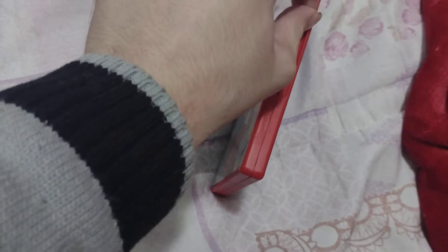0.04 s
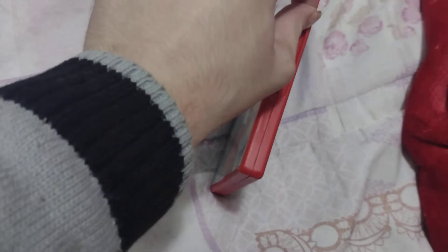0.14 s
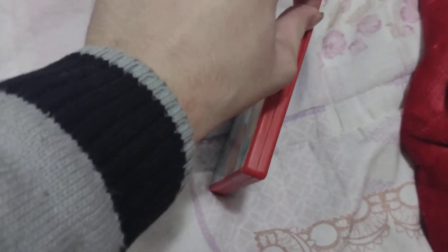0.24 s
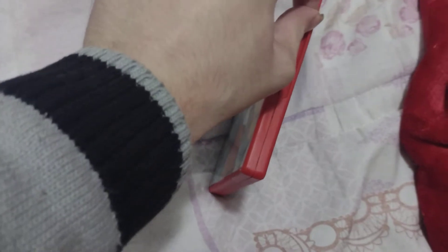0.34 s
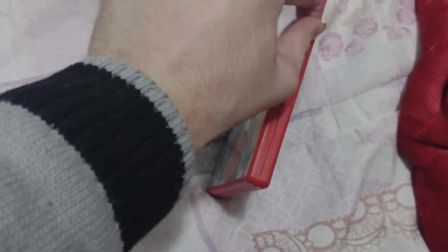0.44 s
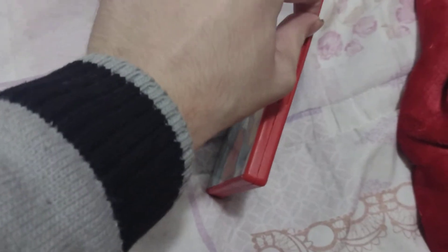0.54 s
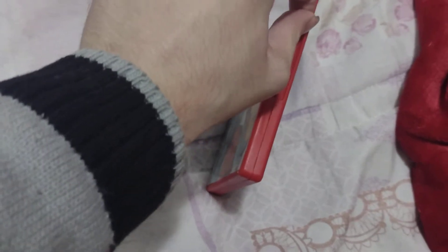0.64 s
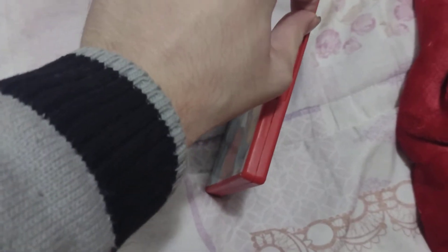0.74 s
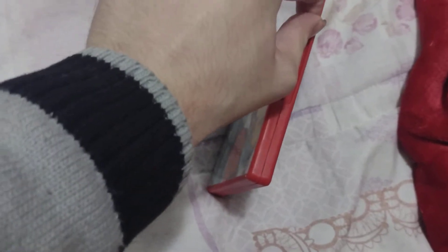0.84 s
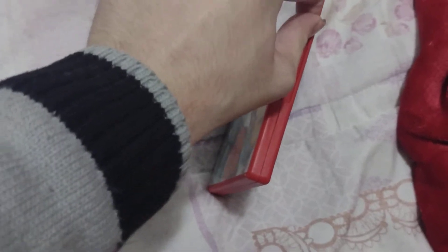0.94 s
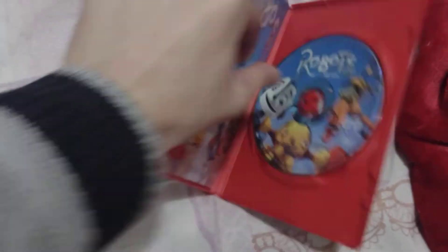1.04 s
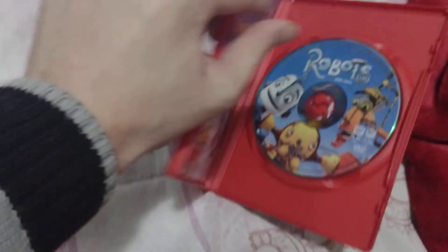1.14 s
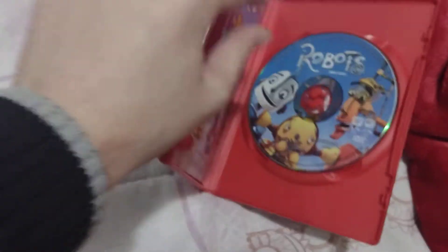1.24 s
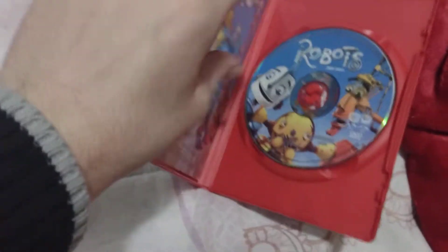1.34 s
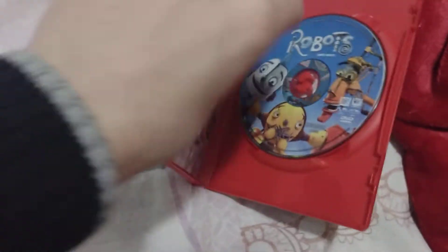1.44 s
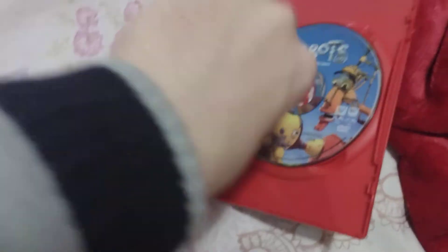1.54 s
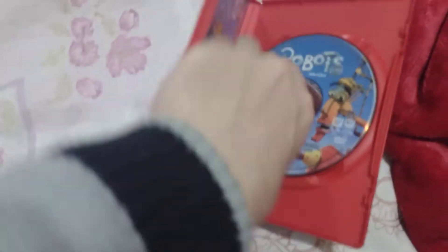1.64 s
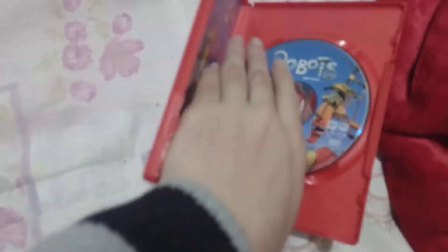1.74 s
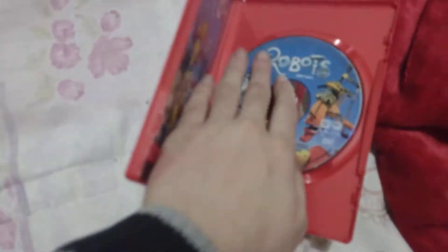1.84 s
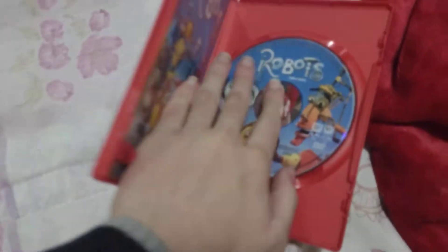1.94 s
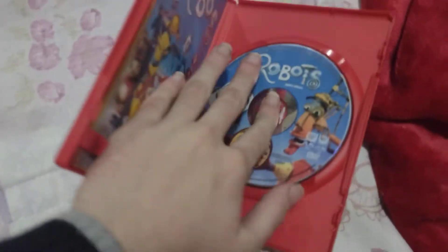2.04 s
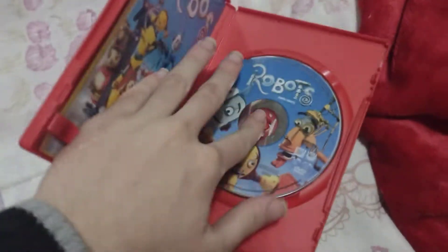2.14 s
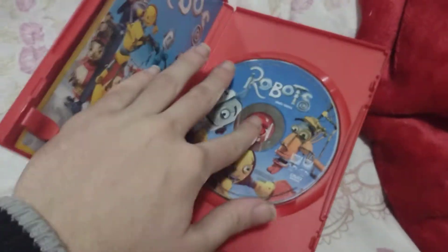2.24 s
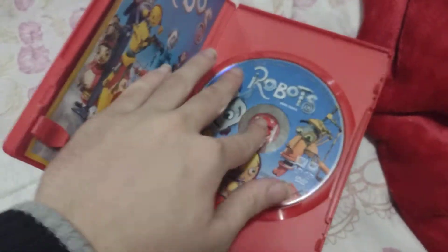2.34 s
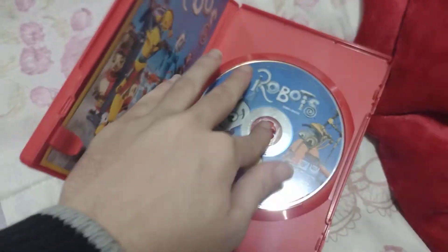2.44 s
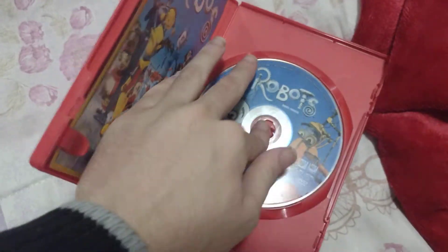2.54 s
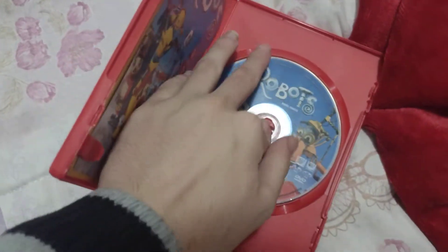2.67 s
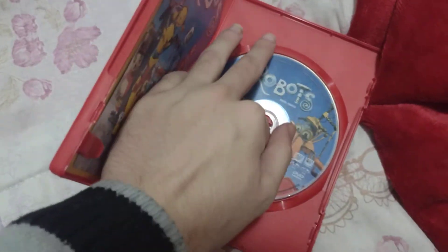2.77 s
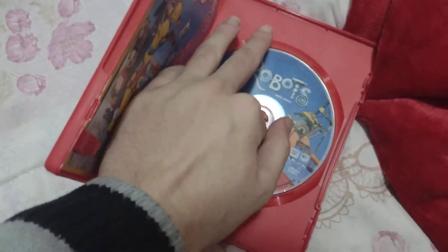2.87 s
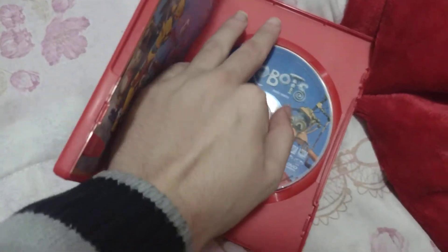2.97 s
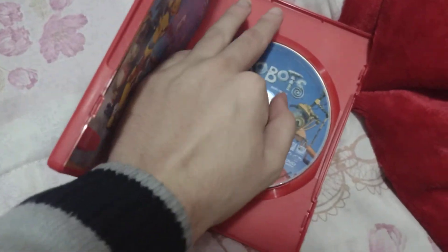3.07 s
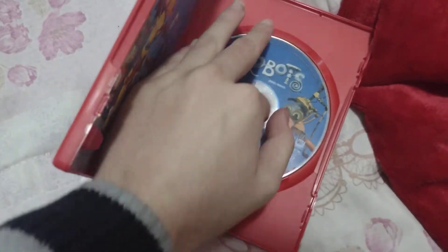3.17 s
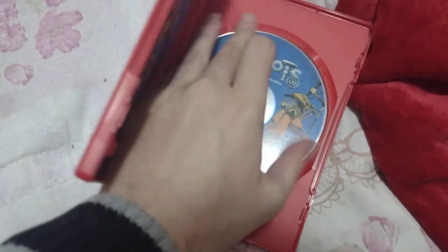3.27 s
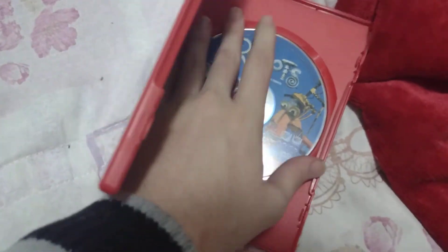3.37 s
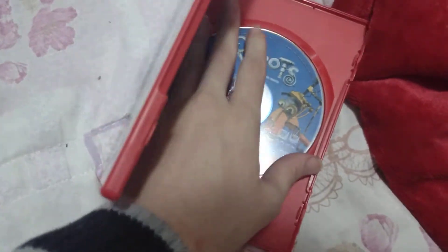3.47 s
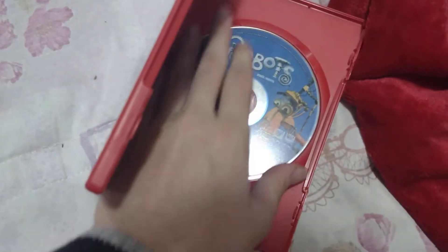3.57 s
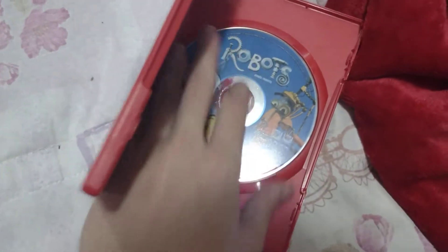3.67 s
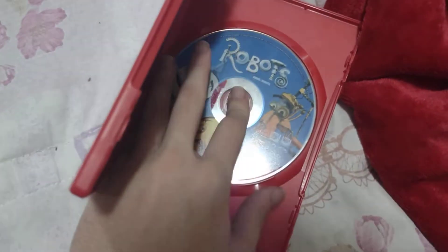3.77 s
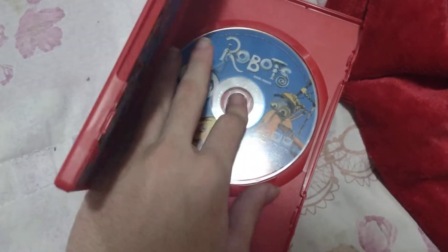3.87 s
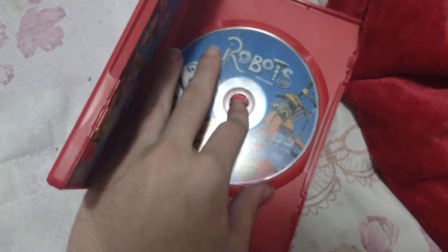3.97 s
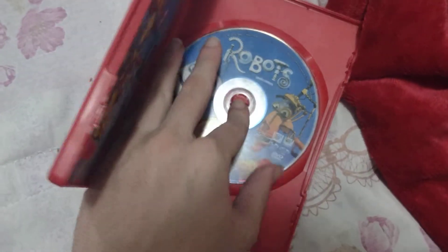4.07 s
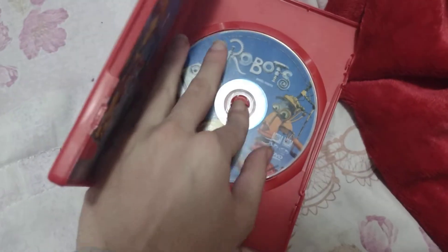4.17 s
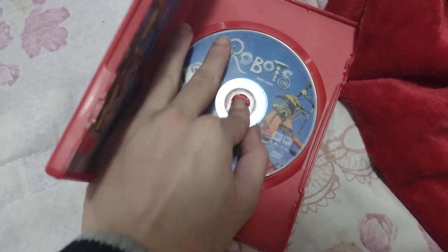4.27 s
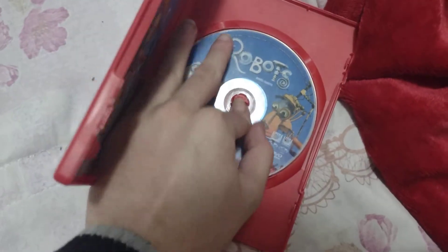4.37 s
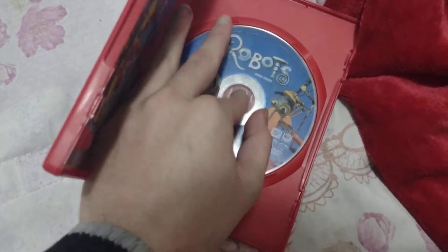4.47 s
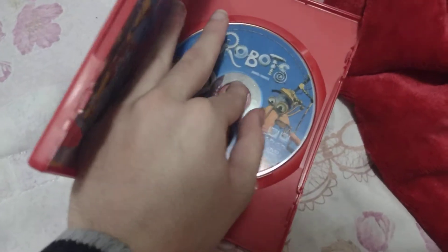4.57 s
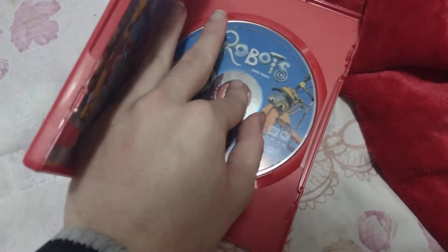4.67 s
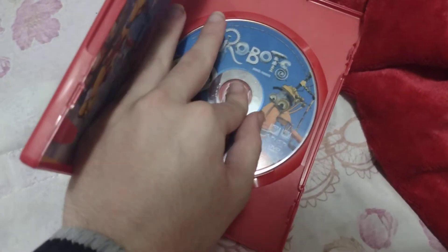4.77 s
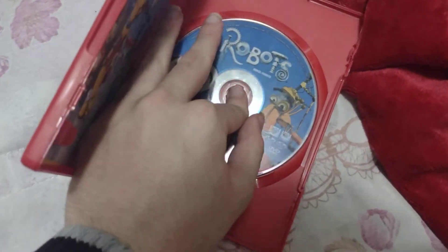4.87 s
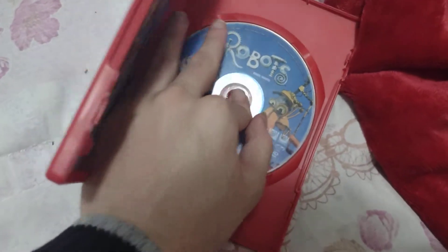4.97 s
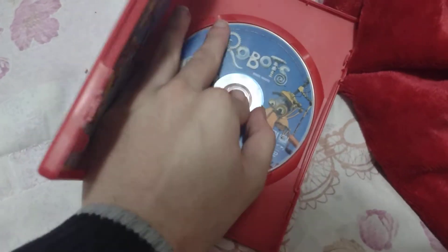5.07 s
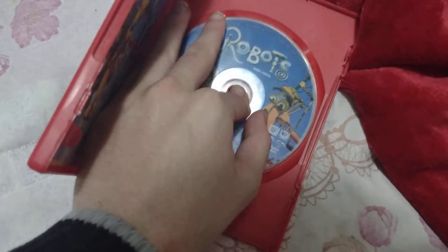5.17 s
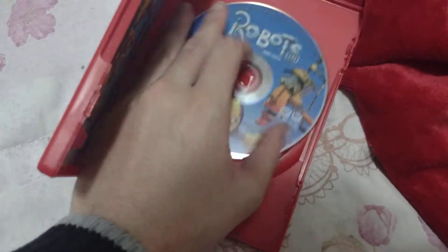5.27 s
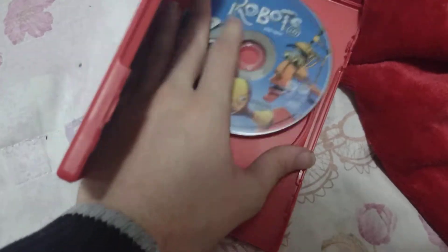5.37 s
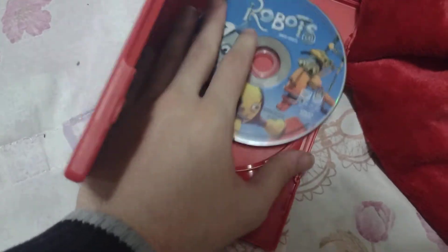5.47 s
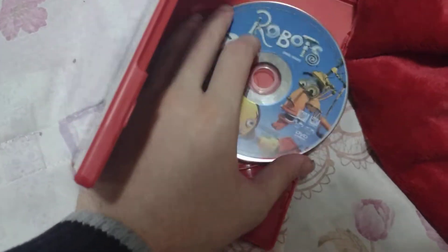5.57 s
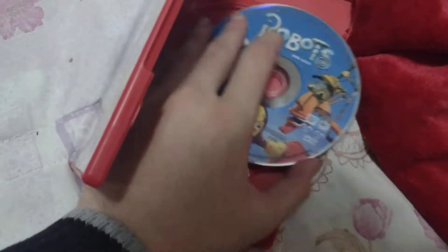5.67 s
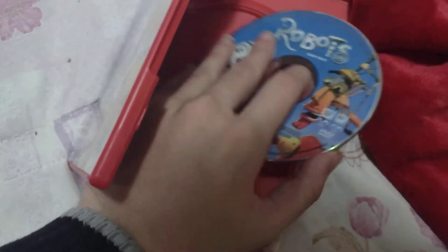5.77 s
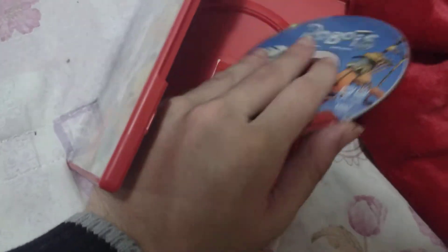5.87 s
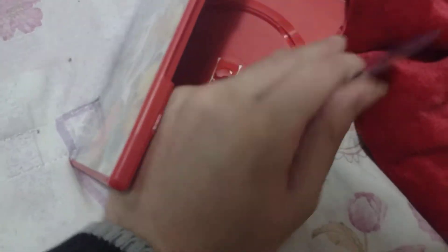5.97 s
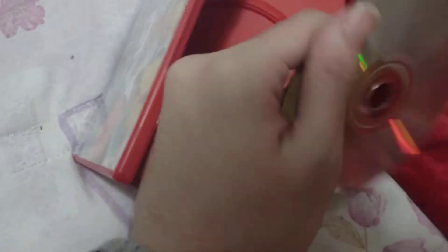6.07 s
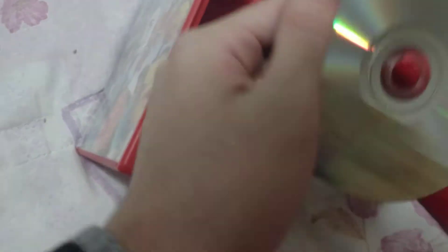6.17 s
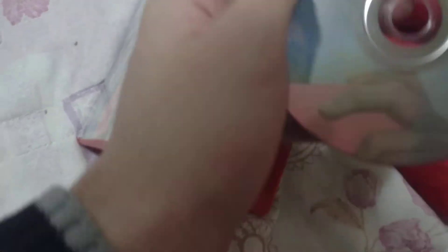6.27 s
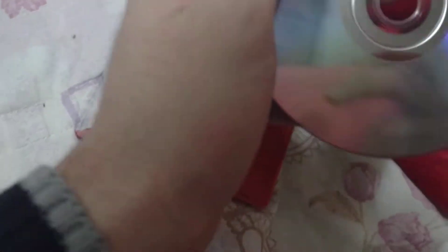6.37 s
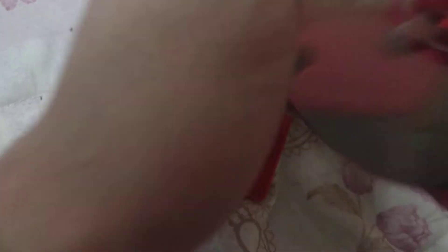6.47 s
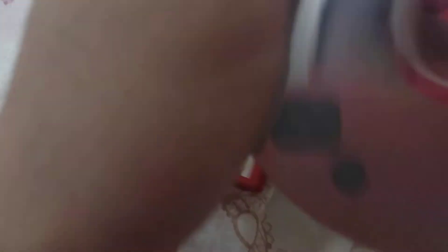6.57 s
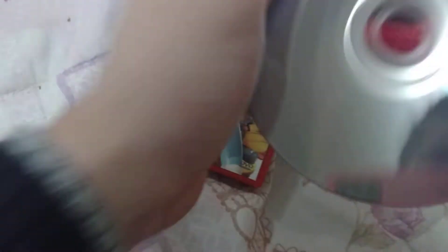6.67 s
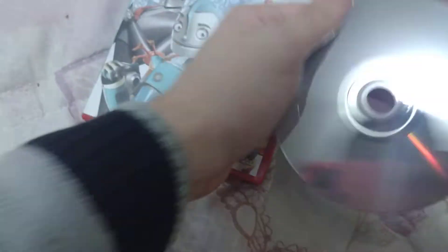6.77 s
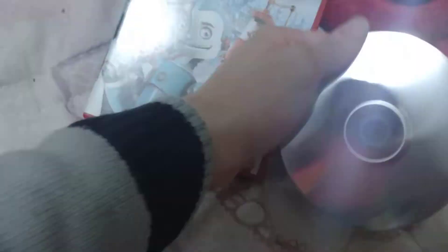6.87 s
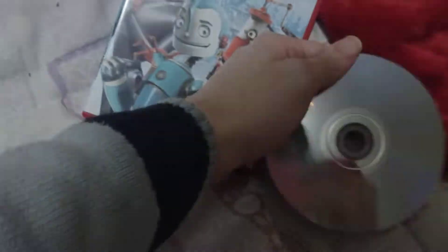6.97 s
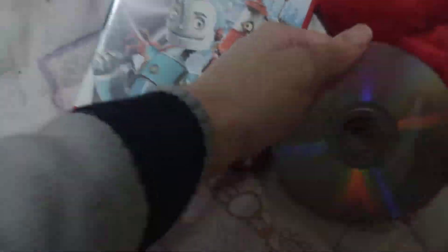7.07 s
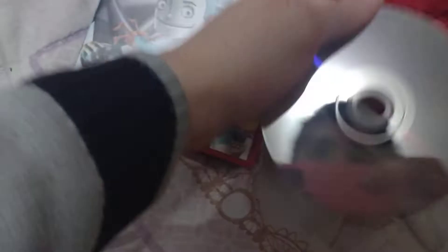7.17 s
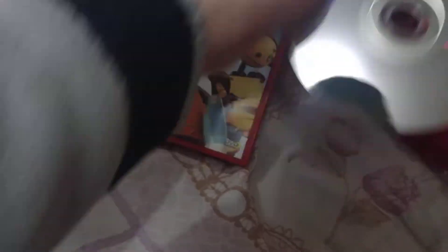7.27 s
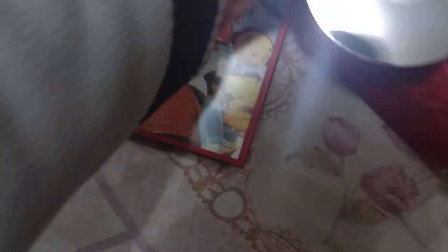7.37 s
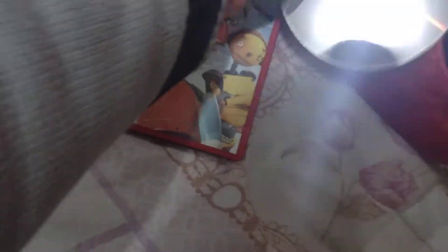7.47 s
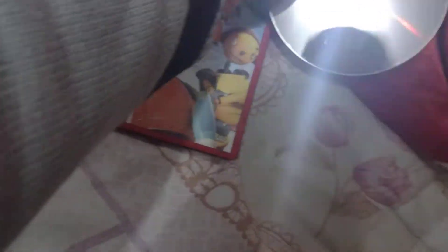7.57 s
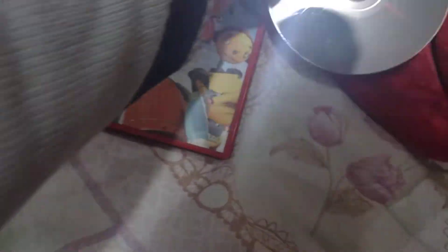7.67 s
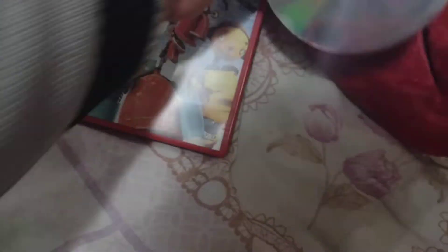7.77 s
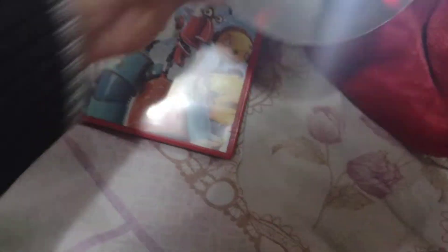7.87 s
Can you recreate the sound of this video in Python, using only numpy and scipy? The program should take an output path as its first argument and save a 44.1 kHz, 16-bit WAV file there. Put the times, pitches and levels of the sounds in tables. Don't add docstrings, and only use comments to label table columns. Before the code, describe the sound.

After a second of near silence, a plastic disc case bursts open with a tight cluster of bright snaps and crackles. Faint hand rubbing and small ticks follow, then scattered sharp clicks as fingers prise the disc from its hub. It pops loose, drags faintly with a hollow hum, and a few duller knocks end it. Close small stereo microphone, furnished room, soft bedding, fluttering gated noise.

```python
import sys
import numpy as np
from scipy import signal
from scipy.fft import rfft, irfft
from scipy.io import wavfile
from scipy.ndimage import uniform_filter1d

SR = 44100
rng = np.random.default_rng(int(sys.argv[2]) if len(sys.argv) > 2 else 0)


def attenuation_scalar(level_db):
    decades = np.asarray(level_db, float) / 20
    return 10 ** decades


def log_audio(samples):
    frames = np.atleast_2d(samples).T
    limited = np.clip(frames, -1, 1)
    pcm = np.round(limited * 32767).astype(np.int16)
    wavfile.write(sys.argv[1], SR, pcm)


N = 349272
T, HZ = np.arange(N) / SR, np.fft.rfftfreq(N, 1 / SR)
SNAP_MS = 1.6

# pitch_hz [Hz], level_db [dB], t60_s [s]
PANEL_MODES = [(216, -10, 0.019), (372, -13, 0.038), (703, -21, 0.04), (870, -5, .014), (1090, -9.5, 0.023),
               (1458, -.6, 0.0074), (1760, -2, 0.0088)]


def level(x, db):
    return x * attenuation_scalar(db) / np.sqrt(np.mean(x ** 2))


def band(x, lo_hz, hi_hz):
    edges = [lo_hz, min(hi_hz, .45 * SR)]
    return signal.sosfilt(signal.butter(2, edges, "bandpass", fs=SR, output="sos"), x)


def colour(points):
    hz, db = np.transpose(points)
    return attenuation_scalar(np.interp(np.log(HZ + 1), np.log(hz), db))


def ring(modes, scatter, size=1536):
    t = np.arange(size) / SR
    hz, db, t60 = np.transpose(modes)[:, :, None]
    phase = 2 * np.pi * hz * (1 + 0.04 * scatter[:, :1]) * t
    decay = np.exp(-np.log(1000) * t / t60)
    return np.sum(attenuation_scalar(db + 3.5 * scatter[:, 1:]) * np.sin(phase) * decay, axis=0)


def walk(rate):
    k = int(SR / rate)
    steps = np.repeat(rng.standard_normal(N // k + 1), k)
    return 1.6 * uniform_filter1d(uniform_filter1d(steps, k), k)[:N]


def contacts():
    # start_s [s], panel_db [dB], crack_db [dB], fizz_db [dB], panel_hz [Hz]
    releases = [(1.109, -40, -34, -36, 1100), (1.1146, -27, -17, -19, 1280), (2.339, -74, -62, -52, 700),
                (2.351, -68, -52, -44, 700), (2.6014, -59, -62, -50, 816), (2.8099, -15.5, -25, -29, 1090),
                (3.071, -18.5, -23, -23.5, 870), (4.3073, -34, -40.5, -49, 920),
                (4.4397, -14.5, -21, -23, 1240), (5.1061, -15, -24, -23, 1100),
                (5.1517, -20.5, -26.5, -21, 1000), (5.2897, -29, -30, -35, 1510),
                (5.4431, -21, -23, -29, 1200), (5.4531, -30.5, -25, -39, 1050),
                (6.7478, -28.5, -37, -39, 1090), (6.9342, -28.5, -40, -34, 1010),
                (6.938, -35, -36, -32, 1000), (6.9905, -26, -30, -40, 880), (7.0249, -15, -26, -32, 800),
                (7.1898, -41, -38.5, -41, 890), (7.5509, -20.5, -26, -40, 1070),
                (7.7935, -41.5, -47.5, -62, 870)]
    # start_s [s], panel_db [dB], crack_db [dB], length_ms [ms]
    open_slips = [(1.0707, -29, -32.5, 4.4), (1.0776, -30.5, -19, 2.6), (1.083, -33, -20.5, 4.5),
                  (1.0866, -22, -22.5, 5.2), (1.095, -41, -29, 5.2), (1.098, -26, -18.5, 5.7),
                  (1.1267, -28, -24, 5.6), (1.1408, -29, -25.5, 7.2), (1.1556, -33, -25.5, 6.2),
                  (1.1775, -41.5, -29.5, 5.6), (2.7573, -60, -42, 2.3), (2.7622, -44.5, -36, 8.2),
                  (3.035, -47, -46, 5.6), (3.2347, -56, -49, 2.7), (3.256, -22.5, -20.5, 7.6),
                  (3.2708, -50, -26, 3.4), (3.503, -41.5, -39, 5.7), (3.6242, -57, -42, 1.6),
                  (3.739, -48, -31.5, 1.5), (4.0068, -39.5, -37, 11.7), (4.368, -46, -43, 3),
                  (4.5507, -26, -20, 4.5), (5.3643, -59, -35.5, 7.1), (5.3935, -30, -23, 3),
                  (5.3985, -30, -25, 2.5), (5.4025, -34, -23, 4), (5.4634, -56, -38, 1.2),
                  (5.8071, -67, -50, 3.3), (5.8359, -64, -37.5, 2.1), (6.04, -39, -25, 30),
                  (6.9114, -47.5, -56, 9.5), (7.827, -69.5, -55, 2.1)]
    lid_slips = [(1.3128, -47.5, -44.5, 6.2), (1.3435, -50, -54, 11), (1.369, -40.5, -37, 4.4),
                 (1.4144, -42, -46.5, 7), (1.544, -52.5, -53, 25), (1.601, -58, -56, 23),
                 (1.7626, -40, -42, 11.4), (1.8288, -43, -40, 12.6), (1.8412, -54, -39.5, 2.2),
                 (1.8853, -32, -33.5, 6), (1.9008, -43, -44, 8.3), (2.0262, -43, -46.5, 8.6),
                 (2.1136, -53, -48.5, 2.1), (2.177, -43.5, -44, 6.3), (2.2816, -55, -48, 2.5),
                 (2.355, -50.5, -54.5, 8.4), (2.4118, -46, -50.5, 9.2), (2.437, -51, -54, 10.5),
                 (2.5411, -53, -54, 13), (2.5653, -42.5, -44.5, 11.4), (2.583, -47.5, -46.5, 2.1),
                 (2.7792, -59, -49, 2.9), (2.8315, -31.5, -41, 16), (2.8537, -39.5, -46, 26),
                 (2.9078, -49.5, -53, 16), (3.1156, -42.5, -58, 41), (3.276, -36, -36, 15.4),
                 (3.3198, -48, -40, 7.2), (3.3338, -43, -41, 5.8)]
    hub_slips = [(3.5793, -56, -64, 12.5), (3.7902, -47, -46, 5.5), (3.853, -56, -47, 14.5),
                 (3.994, -50, -41.5, 12), (4.0398, -46, -52, 14), (4.055, -54, -53, 8.4),
                 (4.1048, -42, -55, 8.5), (4.1464, -45.5, -61, 10.5), (4.153, -55, -49, 3.2),
                 (4.198, -56, -49, .7), (4.2411, -29.5, -42.5, 6.8), (4.267, -45, -44, 2.6),
                 (4.2759, -40, -46, 7.2), (4.2906, -34, -33, 10.4), (4.4555, -49, -62, 5.7),
                 (4.5877, -38, -33, 8.3), (4.6007, -33.5, -34, 4.4), (4.6225, -48, -38, 2.5),
                 (4.6397, -35.5, -28.5, 7.4), (4.6536, -38, -38.5, 1.3), (4.6736, -45, -46, 6.5),
                 (4.7225, -46.5, -48, 10.6), (4.7545, -50.5, -51, 5.6), (4.7815, -52, -54, 10.5)]
    disc_slips = [(4.9471, -53.5, -60, 8.5), (4.9858, -49, -53, 7.4), (5.0182, -37.5, -37.5, 7.6),
                  (5.2795, -30, -33.5, 15), (5.3063, -40, -36.5, 3.3), (5.3469, -43.5, -42, 1.8),
                  (5.3776, -62, -50, 1.1), (5.387, -45, -34, 5), (5.4125, -40.5, -33, 9.4),
                  (5.427, -48, -46, 5.5), (5.4797, -53.5, -47, 7.3), (5.4893, -45, -44, 1.5),
                  (5.5056, -65, -46.5, 2.6), (5.6, -77, -47.5, 22), (5.6531, -49, -52.5, 8.3),
                  (5.88, -41, -39, 28), (5.9489, -41.5, -43, 8.8), (6.0857, -41, -39, 2.1)]
    rows = [(*row, SNAP_MS) for row in releases]
    hand_slips = [*lid_slips, *hub_slips, *disc_slips]
    for slips, fizz_db in ((open_slips, -4.5), (hand_slips, -17)):
        for s, panel_db, crack_db, ms in slips:
            panel_hz = 1050 + 12 * (crack_db - panel_db)
            rows.append((s, panel_db, crack_db, crack_db + fizz_db, panel_hz, ms))
    return rows


def snaps(size=3072):
    # pitch_hz [Hz], level_db [dB], t60_s [s]
    rib_modes = [(2800, 5, 0.018), (3000, 8, .012), (3530, 7.5, 0.011), (4030, -6, 0.022),
                 (5945, -3, 0.027), (5600, -10.5, 0.022), (6700, -8, 0.03)]
    out, t = np.zeros(N + size), np.arange(size) / SR
    for s, panel_db, crack_db, fizz_db, hz, ms in contacts():
        noise, scatter = rng.standard_normal((2, size)), rng.standard_normal((15, 2))
        length = max(ms, .2) / 1000
        grains = noise[0] * attenuation_scalar(1.62 * noise[1])
        onset = 1 - np.exp(-t / (.00008 + 0.1 * length))
        force = grains * onset * np.exp(-(t / length) ** 2.6)
        shove = np.exp(-((t - .0008) / .00012) ** 2) if ms == SNAP_MS else force
        panel_ring = ring([*PANEL_MODES, (hz, 8, .0045)], scatter[:8])
        panel = band(signal.fftconvolve(shove, panel_ring)[:size], 700, 3500)
        ribs = signal.fftconvolve(force, ring(rib_modes, scatter[8:]))[:size]
        crack = band(force, 1800, 6940)
        fizz = band(force, 4500, 15500)
        knock = band(shove, 140, 450)
        parts = ((panel, panel_db - 5), (ribs, crack_db - 9.5), (crack, crack_db - 6),
                 (fizz, fizz_db - 4.5), (knock, panel_db - 28))
        i = int(s * SR)
        out[i:i + size] += sum(level(p, db) for p, db in parts) * np.sqrt(0.0056 * SR / size)
    return out[:N]


def teeth(size=2048):
    strikes = [(1.0715, -24, 3300, .008), (1.0715, -30, 600, .012), (1.079, -22, 1700, .008),
               (1.079, -30, 600, .012), (1.0885, -11, 1180, .01), (1.1155, -16, 1200, .008),
               (1.127, -27, 9000, .014), (1.127, -20, 11500, .012), (1.1415, -26, 7900, .014),
               (1.1565, -29, 8800, .014), (1.886, -34, 1700, .01), (4.4405, -14, 1500, .006),
               (4.64, -24, 2750, .014), (6.99, -32, 8800, .006), (7.552, -22, 1600, .007),
               (1.115, -9.5, 3150, .008), (1.0985, -20, 5600, .012), (1.094, -22, 6600, .008),
               (1.127, -19, 5900, .015), (1.156, -20, 5600, .02), (1.143, -26, 6200, .015),
               (2.811, -22, 4600, .006), (3.072, -20, 6500, .008), (3.072, -20, 3200, .008),
               (3.258, -20, 4600, .012), (3.258, -20, 830, .014), (4.199, -40, 2900, .012),
               (4.242, -34, 3100, .01), (4.242, -32, 430, .015), (4.368, -38, 6000, .01),
               (4.441, -20, 6700, .008), (4.552, -14, 1500, .008), (4.552, -22, 13000, .008),
               (5.1065, -14, 1700, .005), (5.1065, -15, 13500, .006), (5.1065, -22, 4500, .006),
               (5.1525, -19, 13500, .006), (5.1525, -24, 6500, .006), (5.394, -24, 4100, .008),
               (5.403, -22, 6300, .01), (5.4435, -7.5, 6200, .009), (5.4435, -16, 8800, .007),
               (5.836, -36, 6100, .008), (6.748, -30, 850, .01), (6.748, -32, 6500, .006),
               (6.9915, -16, 830, .016), (7.0255, -14, 780, .009), (7.0255, -16, 3400, .005),
               (7.0255, -17, 4200, .004), (7.19, -38, 3200, .008), (6.934, -32, 1600, .007)]
    out = np.zeros(N + size)
    onset = 1 - np.exp(-T[:size] / .0002)
    for s, db, hz, t60 in strikes:
        i = int(s * SR)
        out[i:i + size] += ring([(hz, db, t60)], np.zeros((1, 2)), size=size) * onset
    return out[:N]


def thumps(size=4096):
    knocks = [(1.075, -33, 140), (1.1, -38, 230), (1.415, -46, 165), (2.57, -48, 210), (1.08, -30, 380),
              (1.9, -50, 220), (2.2, -54, 230), (4.15, -46, 200), (4.44, -36, 330), (4.555, -36, 300),
              (5.29, -38, 330), (6.99, -31, 420), (7.025, -27, 350), (4.295, -37, 230), (4.64, -41, 200),
              (5.288, -35, 190), (6.748, -37, 170), (6.915, -42, 110), (7.551, -33, 190), (7.553, -34, 370)]
    t60_s = .05
    out = np.zeros(N + size)
    onset = 1 - np.exp(-T[:size] / .002)
    for s, db, hz in knocks:
        i = int(s * SR)
        out[i:i + size] += ring([(hz, db, t60_s)], np.zeros((1, 2)), size=size) * onset
    return out[:N]


def strokes(per_bright, db):
    # peak_s [s], body_db [dB], brightness_db [dB], rise_s and fall_s [s per 20 dB]
    lid_strokes = [(1.082, -33, 6, .006, .13), (1.2, -53, -1.1, .1, .45), (1.73, -55, .1, .05, .4),
                   (1.77, -53.5, 1.1, .1, .1), (1.9, -58, 4, .15, .05), (2.05, -63, 0.1, .08, .4),
                   (2.22, -63, 4, .5, .3), (1.95, -66, 0.1, .05, .05), (2.59, -51, -13, .06, .1),
                   (2.73, -76, 9, .2, .1), (2.83, -46, -8, .015, .15), (3.09, -54, 1.1, .012, .13),
                   (3.29, -52, 4, .09, .09), (3.49, -60, 0.1, .03, .5), (3.73, -48.5, 6, .25, .18),
                   (4.04, -56, -6, .05, .05), (4.15, -62, -6, .05, .1), (4.29, -46, -7, .06, .25),
                   (4.455, -52, -5, .03, .2), (4.6, -52, -1.1, .3, .16)]
    disc_strokes = [(5.1, -63, 7, .15, .2), (5.165, -50, -5, .012, .18), (5.33, -50, -11, .07, .3),
                    (5.45, -54, 11, .08, .11), (5.55, -68, -5, .1, .14), (5.78, -67, 5, .035, .3),
                    (6.05, -55, 13, .25, .07), (6.12, -60, 4, .1, .28), (6.6, -78, 8, .8, .45),
                    (6.765, -58, 1.1, .015, .2), (6.9, -60, -2.1, .2, .3), (7.04, -50, -7, .05, .2),
                    (7.27, -66, 2.1, .17, .04), (7.38, -68, 2.1, .06, .9), (7.575, -45, -3, .02, .13),
                    (7.68, -68, -15, .1, .3), (7.81, -65, -2.1, .2, .1)]
    t = T[::64]
    s, body, bright, rise, fall = np.transpose([*lid_strokes, *disc_strokes])[:, :, None]
    drop_db = 20 * np.maximum((s - t) / rise, (t - s) / fall)
    swell = np.sum(attenuation_scalar(body + db + per_bright * bright - drop_db), axis=0)
    return np.interp(T, t, swell)


def rubbing():
    grains = rng.standard_normal(N) * attenuation_scalar(1.6 * rng.exponential(size=N))
    grains = grains * attenuation_scalar(1.4 * walk(40) + 2.4 * walk(150))
    through_case = signal.fftconvolve(grains, ring(PANEL_MODES, np.zeros((7, 2))))[:N]
    body = level(band(grains, 200, 1900), -1.1) + level(through_case, -1.5)
    rasp = level(band(grains, 1700, 8100), -1.2) + level(band(grains, 2600, 4500), -6)
    hiss = level(band(grains, 7100, 10000), -.5) + level(band(grains, 11000, 16000), -3)
    rasp, body, hiss = (layer * attenuation_scalar(.9 * walk(25)) for layer in (rasp, body, hiss))
    return rasp * strokes(1, -4) + body * strokes(0, -6.5) + hiss * strokes(1.1, -10.5)


def disc():
    # time_s [s], level_db [dB]
    slide = [
        (5.74, -70),
        (5.772, -57),
        (5.83, -56),
        (5.87, -57),
        (5.925, -56),
        (5.945, -64),
        (6.098, -66),
        (6.12, -86),
    ]
    # pitch_hz [Hz], width_hz [Hz], level_db [dB]
    disc_modes = [(701, 62, 3.5), (980, 63, -2.5), (1503, 120, -7), (1740, 130, -6.5), (2850, 330, -5.5),
                  (3190, 460, -1)]
    drag = rng.standard_normal(N) * attenuation_scalar(3.5 * walk(58))
    hum = sum(level(band(drag, hz - width / 2, hz + width / 2), db) for hz, width, db in disc_modes)
    return level(hum, -0.26) * attenuation_scalar(np.interp(T, *np.transpose(slide), left=-120, right=-120))


def squeaks():
    rubs = [(1.77, .04, 3200, 800, -60), (1.76, .07, 1050, 350, -56), (4.012, .03, 2900, 600, -52),
            (5.03, .03, 3500, 900, -54), (5.36, .035, 3300, 900, -54), (5.375, .02, 6000, 1000, -52),
            (5.62, .03, 2900, 500, -64), (5.785, .06, 3300, 500, -54), (5.79, .05, 980, 90, -59),
            (5.89, .045, 980, 90, -58), (5.9, .05, 6000, 1100, -62), (5.953, .015, 3200, 400, -55),
            (5.955, .03, 720, 90, -56), (6.02, .05, 1500, 110, -61), (6.025, .018, 5550, 180, -48),
            (6.025, .015, 3300, 400, -57), (6.062, .022, 6600, 900, -48), (7.07, .12, 750, 500, -50),
            (7.59, .1, 1000, 800, -50)]
    out = np.zeros(N)
    drag = rng.standard_normal(N) * attenuation_scalar(3 * walk(120))
    for s, length, hz, width, db in rubs:
        near = slice(int((s - .15) * SR), int((s + .15) * SR))
        squeak = level(band(drag[near], hz - width / 2, hz + width / 2), db)
        out[near] += squeak * np.exp(-np.abs(2 * (T[near] - s) / length) ** 3)
    return out


def sheet(case):
    scatter = band(rng.standard_normal((2, 48)), 4000, 16000)
    return signal.fftconvolve(case[None], attenuation_scalar(-27) * scatter)[:, :N]


def room(x, size=16384):
    octaves = [(207, -20, 0.21), (500, -19, 0.18), (1100, -17.5, 0.17), (2700, -12.5, .16),
               (5000, -11, 0.14), (11000, -24, .12)]
    t, noise = np.arange(size) / SR, rng.standard_normal((3, size))
    ports = noise[0] + .5 * band(noise[1:], 600, 19000)
    tail = 0
    for hz, db, t60 in octaves:
        decay = np.exp(-np.log(1000) * t / t60)
        tail = tail + level(band(ports, hz / 1.5, hz * 1.372), db - 33.5) * decay
    onset = 1 - np.exp(-(t / 0.002) ** 2)
    return signal.fftconvolve(x[None], tail * onset)[:, :N]


def air():
    # pitch_hz [Hz], level_db [dB]
    tone_colour = [(20, -30.5), (40, -1), (120, 4), (400, 2.5), (1200, -4.5), (3000, -16), (8000, -17.5),
                   (16000, -14)]
    tone = level(irfft(rfft(rng.standard_normal(N)) * colour(tone_colour), N), -68)
    return tone + attenuation_scalar(-82) * rng.standard_normal((2, N))


def scene():
    # middle_s [s], length_s [s], depth_db [dB]
    background_dips = [(.065, .01, -12), (.21, .006, -6), (.3, .012, -3), (.4, .008, -7), (.455, .005, -5),
                       (.5, .006, -5), (.02, .004, -4), (.578, .005, -5), (.815, .005, -4), (.9, .008, -3),
                       (.972, .006, -4), (.6, .009, -12), (.84, .01, -7), (.878, .006, -6), (1.51, .008, -2),
                       (1.81, .01, -8), (5.7, .014, -9), (5.725, .014, -5), (6.49, .01, -2),
                       (7.315, .012, -5), (7.345, .01, -5)]
    lull = attenuation_scalar(sum(db * np.exp(-((T - s) / length) ** 4) for s, length, db in background_dips))
    case = snaps() + teeth() + thumps() + rubbing() * lull + disc() + squeaks()
    both = case + sheet(case) + room(case) + air() * lull
    lead_s = .0000155
    facing = attenuation_scalar(8.0 * HZ / 12000 - .4) * np.exp(2j * np.pi * HZ * lead_s)
    return np.array([both[0], irfft(rfft(both[1]) * facing, N)])


def band_limit(x):
    return signal.sosfilt(signal.butter(12, 16850, fs=SR, output="sos"), x)


def record(dry):
    # pitch_hz [Hz], level_db [dB]
    mic_colour = [(1000, -.5), (2100, 6), (2700, 5), (3700, 3.5), (4600, -.5), (8500, .5), (12000, -4.5),
                  (16000, -17)]
    # pitch_hz [Hz], level_db [dB]
    right_colour = [(100, 6), (400, 3.6), (1100, 2.5), (1700, -5.5), (2600, 1), (7000, 1.2), (11000, .4),
                    (16000, 2)]
    late = np.exp(-2j * np.pi * HZ * .0004055)
    share = np.array([.55 + .17 * HZ / 12000, .69 + .55 * HZ / 12000])
    wide = rfft(dry) - share * rfft(dry[::-1]) * late
    wide = wide / (1 - .15 * late)
    wide = irfft(wide * colour(mic_colour) * [np.ones_like(HZ), colour(right_colour)], N)
    wide = signal.sosfilt(signal.butter(2, 85, "highpass", fs=SR, output="sos"), wide)
    wide = signal.sosfilt(signal.cheby1(8, .5, 15600, fs=SR, output="sos"), wide)
    hold = int(.003 * SR)
    heard_db = 10 * np.log10(1e-16 + uniform_filter1d(np.mean(wide ** 2, axis=0), hold))
    hiss_db = np.median(heard_db[:SR])
    gate_db = np.clip(8.0 * (heard_db - hiss_db - .5), -40, 0)
    gated = wide * uniform_filter1d(attenuation_scalar(gate_db), hold // 2) - .00006
    return band_limit(np.clip(gated, -1, 1))


dry = scene()
out = record(dry)
log_audio(out)
```